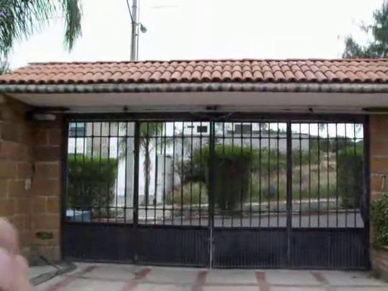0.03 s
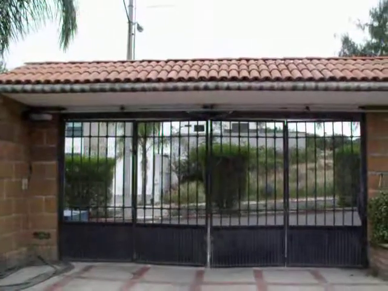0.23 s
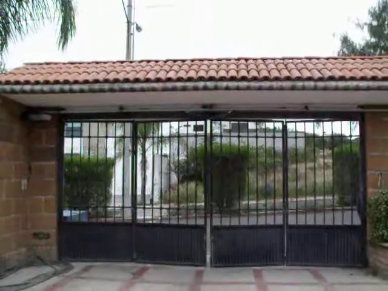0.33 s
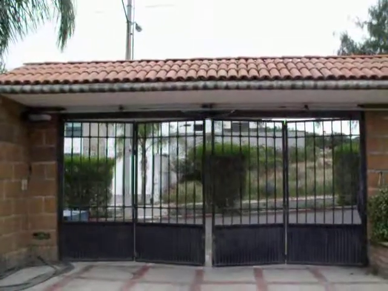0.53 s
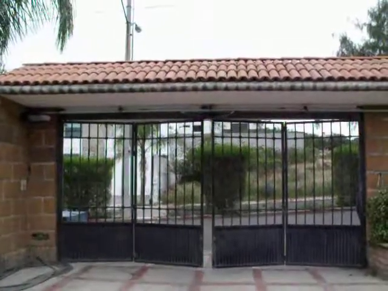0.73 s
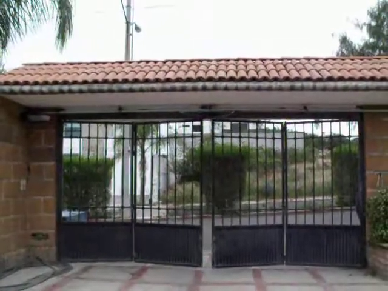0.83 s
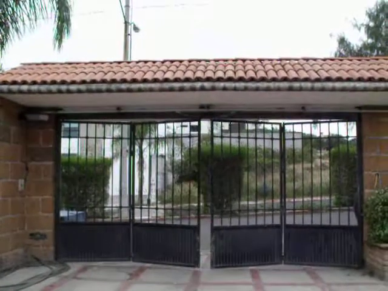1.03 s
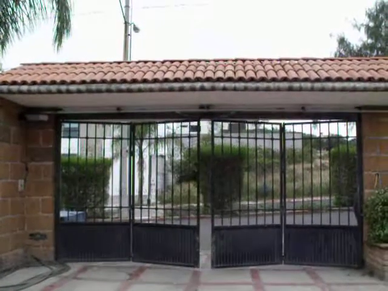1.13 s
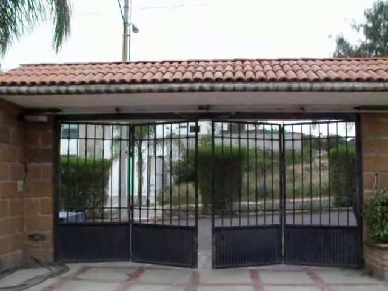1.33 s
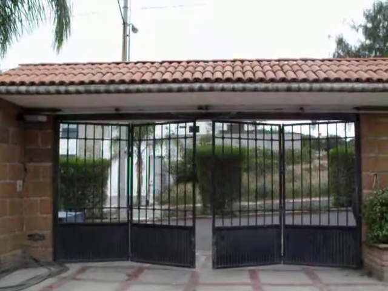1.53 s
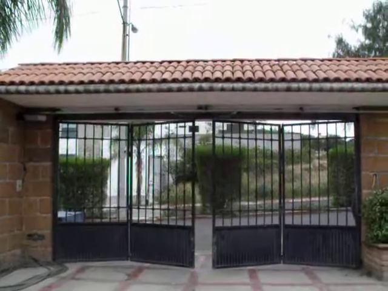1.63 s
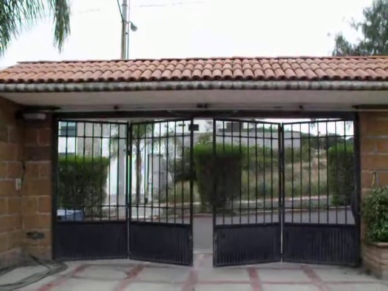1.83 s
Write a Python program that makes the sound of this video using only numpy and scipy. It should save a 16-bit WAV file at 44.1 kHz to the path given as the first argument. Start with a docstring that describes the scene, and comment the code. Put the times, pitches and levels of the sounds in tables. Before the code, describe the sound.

A steel gate scrapes and clanks loudly, then swings open with a droning motor.

```python
"""Under a tiled porch roof, a steel driveway gate starts to open. The drive takes up the slack with a
rising scrape of steel on steel. The leaves break free in a loud cluster of clanks and a soft boom, then
swing on, knocking now and then; each blow rings the frame and echoes under the roof.
Underneath, the motor drones through the panels and the running chain makes a nearly steady rush."""
import sys
import numpy as np
from scipy import signal
from scipy.fft import rfft, irfft, next_fast_len
from scipy.io import wavfile
from scipy.ndimage import map_coordinates

SR = 44100
rng = np.random.default_rng(int(sys.argv[2]) if len(sys.argv) > 2 else 0)


def generate_wav(signal):
    """Clip the signal to [-1, 1] and save it as 16-bit WAV at the path in sys.argv[1]."""
    frames = np.transpose(np.atleast_2d(signal))
    scaled = np.clip(frames, -1, 1) * 32767
    pcm = np.round(scaled).astype(np.int16)
    wavfile.write(sys.argv[1], SR, pcm)


N = 83790
T = np.arange(N) / SR
FFT_SIZE = next_fast_len(N + 8192)
CLANK_ATTACK_S, RING_ATTACK_S, RING_DRIFT_RAD = 0.0039, 0.0025, 0.47

# leaves breaking free:
# (time [s], clank [dB], panel note [Hz], clash [dB], clash tilt [dB/octave], frame ring [dB])
JOLT_BLOWS = [(0.195, -30, 1060, -48, -1, -26), (0.203, -52, 1110, -20, 6.5, -37),
              (0.212, -25.5, 665, -22, -3, -46.5), (0.223, -18.5, 2590, -23.5, -5.5, -43),
              (0.256, -27.5, 990, -12, 4.5, -23), (0.279, -20, 1075, -10.5, -2, -19.5),
              (0.296, -27, 1130, -17, 5, -33.5), (0.309, -24.5, 950, -11.5, -2.5, -23),
              (0.32, -18, 1034, -14.5, -4, -21.5), (0.33, -20.5, 1146, -22.5, 5.5, -26),
              (.427, -23.5, 1080, -20.5, -0.5, -44.5), (0.449, -20, 865, -21, -9.5, -32),
              (0.479, -24, 1080, -19.5, -2.5, -31), (0.491, -18.5, 1110, -26, -3.5, -28.5),
              (0.522, -25.5, 1005, -35, -2, -46), (0.564, -30, 830, -45.5, -10, -41)]
# swinging leaves and linkage: columns as JOLT_BLOWS
KNOCK_BLOWS = [(0.743, -32, 415, -51, -7.5, -48), (0.762, -32, 870, -31, 5.5, -54),
               (0.768, -32.5, 1050, -38, 0, -32.5), (0.893, -30.5, 1053, -30, 3, -37),
               (0.91, -25, 1106, -30, -8, -40.5), (0.972, -33, 1360, -39.5, -4.5, -58),
               (0.997, -36, 1020, -31.5, 5, -41), (1.037, -34, 1000, -37, -8, -39.5),
               (1.087, -37, 395, -33.5, -1, -41), (1.106, -40.5, 916, -28, -16, -55),
               (1.293, -33, 860, -49, -12, -52), (1.297, -26, 786, -36, -11, -41.5),
               (1.316, -27.5, 1153, -45, -9, -53), (1.43, -38, 1330, -27, 2.5, -51),
               (1.44, -32.5, 1375, -21.5, -4.5, -49.5), (1.46, -39.5, 940, -23, -11, -56),
               (1.728, -35, 1040, -53, 20, -47), (1.864, -54, 930, -38.5, 4, -44)]
# hard steel contact spectrum: (frequency [Hz], level [dB])
HARD_CLASH_SPECTRUM = [(400, -32), (1200, -23.5), (1550, 0), (1950, -8), (2350, 1.2), (3300, 2.5),
                       (4400, -4), (5400, -5), (6200, -28)]


def amp(db):
    """Decibels to gain."""
    return 10 ** (np.asarray(db) / 20)


def unit(x):
    """Scale to rms 1."""
    return x / np.sqrt(np.mean(x ** 2) + 1e-20)


def level(points):
    """Gain per sample from (time [s], level [dB]) points."""
    return amp(np.interp(T, *np.transpose(points)))


def wobble(knots_per_s):
    """Smooth random curve."""
    return map_coordinates(rng.standard_normal(2048), [T * knots_per_s + 2], mode="wrap")


def noise(grain_db=0):
    """White noise in 24-sample grains, levels scattered by grain_db."""
    grains = np.repeat(rng.standard_normal(N // 24 + 1), 24)[:N]
    return rng.standard_normal(N) * amp(grain_db * grains)


def coloured(x, spectrum, tilt_db_per_oct=0):
    """Filter by (frequency [Hz], level [dB]) points plus a tilt; rms 1."""
    octave = np.log2(np.fft.rfftfreq(FFT_SIZE, 1 / SR) + 1)
    hz, db = np.transpose(spectrum)
    tilted_db = db + tilt_db_per_oct * np.log2(hz / hz[0])
    gain = amp(np.interp(octave, np.log2(hz), tilted_db))
    return unit(irfft(rfft(x, FFT_SIZE) * gain, FFT_SIZE)[:N])


def lowpass(x, cutoff_hz):
    """Steep low-pass."""
    hz = np.fft.rfftfreq(FFT_SIZE, 1 / SR)
    return irfft(rfft(x, FFT_SIZE) / np.sqrt(1 + (hz / cutoff_hz) ** 120), FFT_SIZE)[:, :N]


def resonance(hz, q):
    """Noisy note of a steel panel (low q) or bar (high q); rms 1."""
    b, a = signal.iirpeak(hz, q, SR)
    return unit(signal.lfilter(b, a, signal.lfilter(b, a, noise())))


def fade(t, t60_s):
    """Exponential decay."""
    return np.exp(-np.log(1000) * t / t60_s)


def strike(t, attack_s, t60_s):
    """Envelope: rise, then decay."""
    return (1 - np.exp(-t / attack_s)) * fade(t, t60_s)


def porch_burst(t, attack_s, t60_s, tail_db, tail_t60_s):
    """Strike envelope plus the porch's reverberant tail, summed in power."""
    return np.hypot(strike(t, attack_s, t60_s), amp(tail_db) * strike(t, attack_s, tail_t60_s))


def air():
    """Faint, steady outdoor noise."""
    # (frequency [Hz], level [dB])
    air_spectrum = [(20, -3), (70, -8.5), (180, -3.5), (500, -19), (1030, -7.5), (1900, -17), (5000, -11.5),
                    (5900, -45.5)]
    return amp(-53) * coloured(noise(), air_spectrum)


def motor():
    """Panels rumble with the motor's load; its hum wavers and swells on one note after another."""
    # rumble under load: (time [s], level [dB])
    load_curve = [(0, -38.5), (.14, -43), (.52, -36.5), (.85, -37.5), (1.15, -44.5), (1.45, -43.5),
                  (1.9, -44.5)]
    # panel rumble: (frequency [Hz], level [dB])
    rumble_spectrum = [(25, -36), (60, -12.5), (100, -10), (135, -2), (175, -1.5), (205, -5.5), (280, -8.5),
                       (350, -16), (450, -9.5), (600, -20), (1500, -43)]
    # hum swells: (time [s], half width [s], frequency [Hz], level [dB])
    hum_swells = [(.58, 0.25, 219.3, -39.5), (.76, 0.063, 146, -38), (1.38, 0.16, 140.9, -42.5),
                  (1.58, 0.037, 175, -35.5)]
    hum_hz, hum_db, drift_rad = 172, -47.5, 0.8

    def tone(hz):
        return np.sin(2 * np.pi * hz * T + drift_rad * wobble(3.7))

    swells = np.zeros(N)
    for peak_s, width_s, hz, db in hum_swells:
        swells += amp(db) * np.exp(-((T - peak_s) / width_s) ** 2) * tone(hz)
    load = level(load_curve)
    rumble = load * coloured(noise(), rumble_spectrum)
    hum = unit(load) * amp(hum_db) * tone(hum_hz)
    return rumble + hum + swells


def chain():
    """The running chain makes a nearly steady rushing noise that slowly swells and fades."""
    # slow swell and fade: (time [s], level [dB])
    chain_curve = [(0, -40.5), (.35, -40), (.72, -38), (.86, -43), (1.0, -36), (1.25, -39.5), (1.68, -44.5),
                   (1.9, -45.5)]
    # chain rush: (frequency [Hz], level [dB])
    chain_spectrum = [(250, -11), (600, -2.5), (850, 4), (1080, 4), (1400, -0.5), (2100, -6.5),
                      (2800, -7.5), (5400, -20.5), (6200, -41)]
    links_per_s, scatter_links, spread_db = 13, 0.39, 0.5
    bumps = np.zeros(N)
    for link, (late, weak) in enumerate(rng.standard_normal((80, 2))):
        t = np.maximum(T - (link + scatter_links * late) / links_per_s, 0)
        bumps += amp(-spread_db * weak) * strike(t, CLANK_ATTACK_S, t60_s=0.02)
    ripple = unit(np.hypot(1, amp(3) * bumps))  # under 1 dB per link
    return level(chain_curve) * ripple * coloured(noise(), chain_spectrum)


def scrape():
    """Steel rubs on steel and sets bars singing as the drive loads the shut gate, until it lets go."""
    # rising scrape: (time [s], level [dB])
    scrape_curve = [(0, -40), (.045, -44.5), (.07, -35.5), (.11, -33), (.17, -28.5), (.21, -30.5),
                    (.245, -30)]
    # friction noise: (frequency [Hz], level [dB])
    friction_spectrum = [(300, -10), (700, -12), (1080, 6), (1400, -3.5), (2100, 1), (3100, 0.5),
                         (4200, -1), (5300, -4.5), (6200, -25)]
    # singing bars: (frequency [Hz])
    bar_notes = [1131, 2235, 2910, 3135]
    release_s = scrape_curve[-1][0]
    friction = coloured(noise(grain_db=0.5), friction_spectrum)
    bars = unit(sum(resonance(hz, q=70) for hz in bar_notes))
    flicker = amp(1.2 * wobble(82.0))
    return (T < release_s) * level(scrape_curve) * flicker * unit(friction + amp(-6.5) * bars)


def leaf_boom(start_s=0.426):
    """The freed leaf flexes with a soft, low boom."""
    t = np.maximum(T - start_s, 0)
    return amp(-36) * resonance(hz=89, q=5.4) * strike(t, attack_s=0.045, t60_s=0.59)


def drive_arm(start_s=1.442):
    """The arm knocks over in its joint and rings."""
    # arm modes: (frequency [Hz])
    arm_modes = [1546, 2525, 2895, 3210]
    t = np.maximum(T - start_s, 0)
    ring = sum(np.sin(2 * np.pi * hz * t + RING_DRIFT_RAD * wobble(38.0)) for hz in arm_modes)
    return amp(-32.5) * unit(ring) * strike(t, RING_ATTACK_S, t60_s=0.25)


def frame_ring():
    """Each blow feeds energy to the frame's modes, which waver and decay, high ones first."""
    # steel frame modes: (frequency [Hz], gain [dB])
    frame_modes = [(1042, -6), (1066, 1), (1152, -10.5), (1626, -11), (2250, -7.5), (2380, -12),
                   (2572, -10.5), (2679, -9), (2837, -14.5), (3030, -12.5), (3233, -6.5), (3270, -11.5),
                   (3498, -12.5), (3870, -13.5), (4923, -13)]
    t60_at_1khz_s = 0.64
    kicks = np.zeros(N)
    for start_s, *_, ring_db in JOLT_BLOWS + KNOCK_BLOWS:
        kicks[round(start_s * SR)] += amp(ring_db) ** 2
    out = np.zeros(N)
    for hz, db in frame_modes:
        t60_s = t60_at_1khz_s * (hz / 1000) ** -0.51
        energy = signal.fftconvolve(kicks, strike(T, RING_ATTACK_S, t60_s) ** 2)[:N]
        phase = 2 * np.pi * (hz * T + rng.random()) + RING_DRIFT_RAD * wobble(35.46)
        out += amp(db) * np.sqrt(np.abs(energy)) * np.sin(phase)
    return out


def blows(table, clash_spectrum, clash_t60_s):
    """Per blow: a hollow panel clank and a bright clash of loose steel, gritty at first, then smooth."""
    # hollow clank: (frequency [Hz], level [dB])
    clank_spectrum = [(50, -29), (130, -21.5), (420, -4), (600, -5.5), (820, -0.5), (1090, 3), (1350, -2),
                      (1800, -3.5), (3000, -23.5), (6000, -52)]
    out = np.zeros(N)
    for start_s, clank_db, panel_hz, clash_db, tilt_db_per_oct, _ in table:
        t = np.maximum(T - start_s, 0)
        body = coloured(noise(), clank_spectrum)
        clank = unit(body + amp(1.5) * resonance(panel_hz, q=5.4))
        clank *= porch_burst(t, CLANK_ATTACK_S, t60_s=0.17, tail_db=-8, tail_t60_s=0.58)
        grit_db = 2.5 * fade(t, t60_s=0.67) * (T > start_s)
        clash = coloured(noise(grit_db), clash_spectrum, tilt_db_per_oct)
        clash *= porch_burst(t, attack_s=0.0028, t60_s=clash_t60_s, tail_db=-10, tail_t60_s=0.52)
        out += amp(clank_db) * clank + amp(clash_db) * clash
    return out


def knocks():
    """The swinging leaves and their linkage knock now and then."""
    # light steel contact: (frequency [Hz], level [dB])
    light_clash_spectrum = [(400, -34.5), (1200, -8.5), (1600, -4), (2200, -3.5), (2700, 1), (4000, -4.5),
                            (5200, -7.5), (6200, -30.5)]
    return blows(KNOCK_BLOWS, light_clash_spectrum, clash_t60_s=0.14)


def jolts():
    """The leaves break free in a dense cluster of blows."""
    return blows(JOLT_BLOWS, HARD_CLASH_SPECTRUM, clash_t60_s=0.13)


def latch_cracks():
    """Hard steel-on-steel contacts, milliseconds long, stand out of the rattle."""
    # hardest latch contacts: (time [s], level [dB])
    contacts = [(.2595, -8.5), (0.2863, -10), (0.3154, -4.5), (.324, -14), (0.4911, -14)]
    out = np.zeros(N)
    for start_s, db in contacts:
        envelope = (T >= start_s) * fade(np.maximum(T - start_s, 0), t60_s=0.0088)
        out += amp(db) * coloured(noise(), HARD_CLASH_SPECTRUM) * envelope
    return out


def scene():
    """Gate, drive and outdoor air; mono."""
    gate = scrape() + jolts() + latch_cracks() + knocks() + drive_arm() + frame_ring()
    return (gate + motor() + chain() + air() + leaf_boom())[None]


def record(dry):
    """Narrow band; soft clipping rounds the highest peaks and spits a little treble."""
    ceiling = 0.72
    narrow = lowpass(dry, cutoff_hz=5950)
    clipped = narrow / (1 + np.abs(narrow / ceiling) ** 20) ** (1 / 20)
    return lowpass(clipped, cutoff_hz=15900)


dry = scene()
out = record(dry)
generate_wav(out)
```